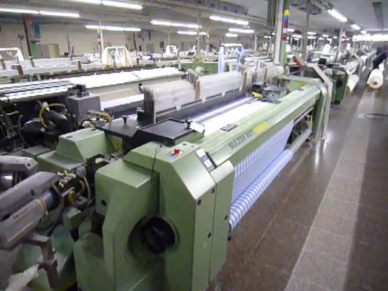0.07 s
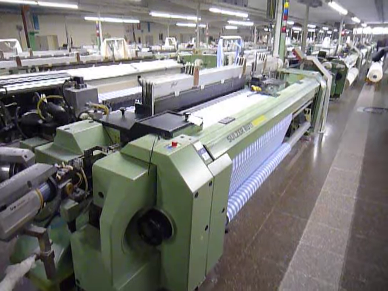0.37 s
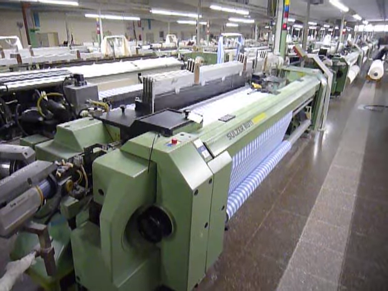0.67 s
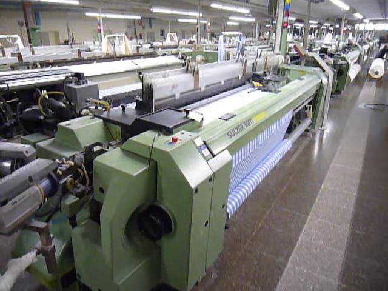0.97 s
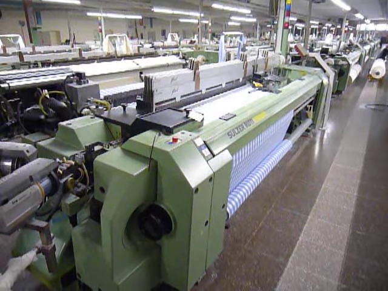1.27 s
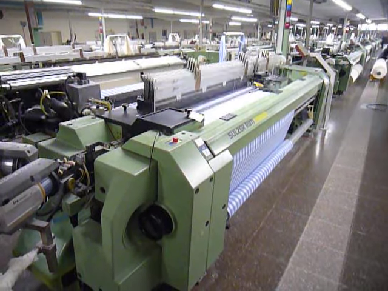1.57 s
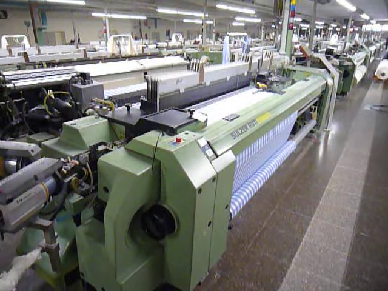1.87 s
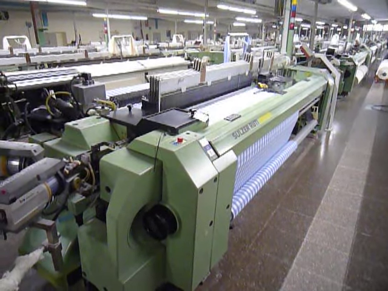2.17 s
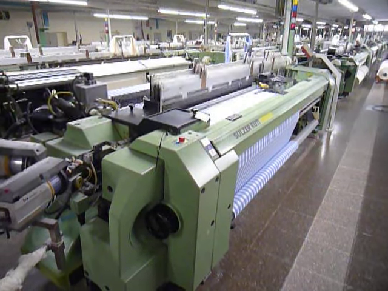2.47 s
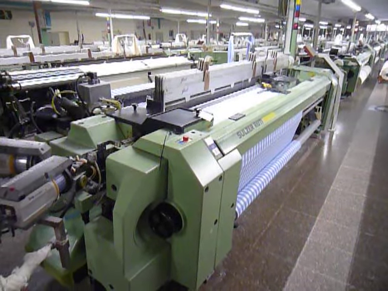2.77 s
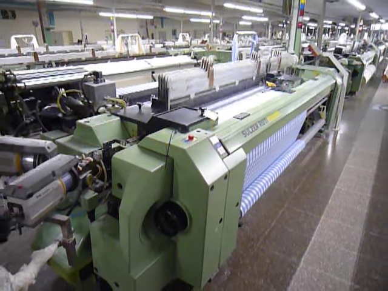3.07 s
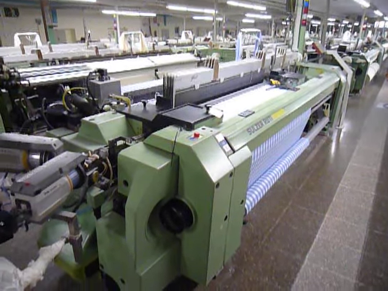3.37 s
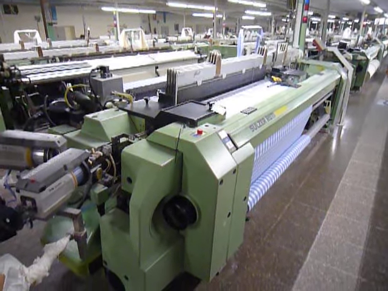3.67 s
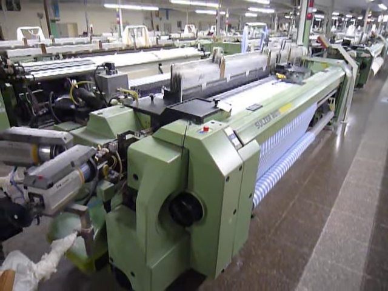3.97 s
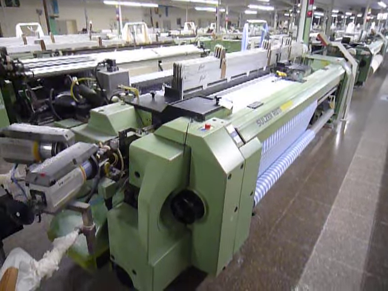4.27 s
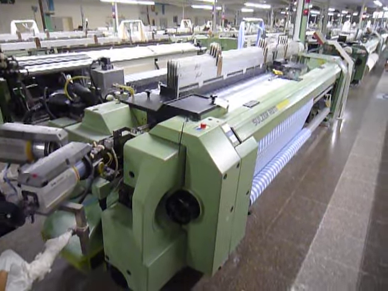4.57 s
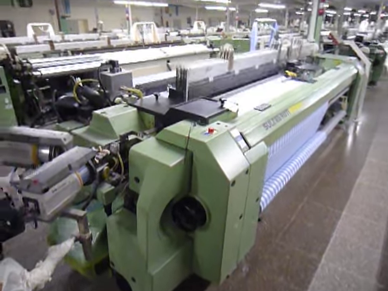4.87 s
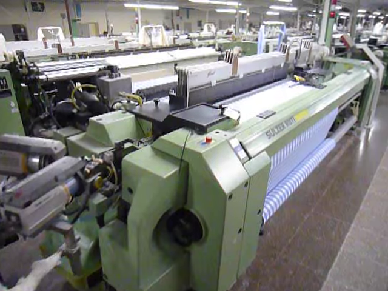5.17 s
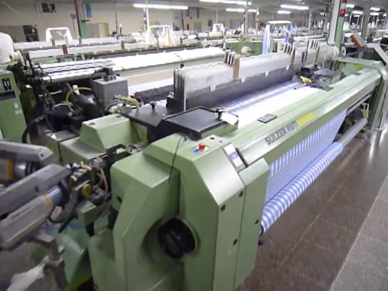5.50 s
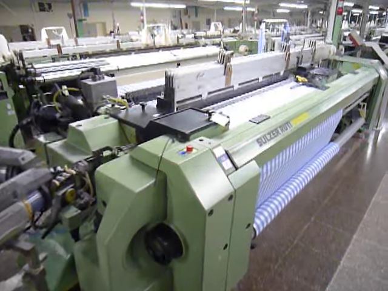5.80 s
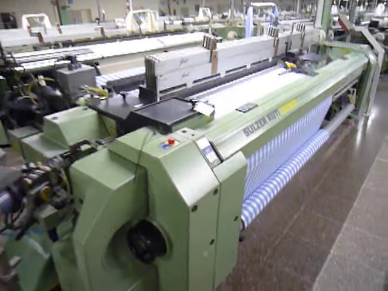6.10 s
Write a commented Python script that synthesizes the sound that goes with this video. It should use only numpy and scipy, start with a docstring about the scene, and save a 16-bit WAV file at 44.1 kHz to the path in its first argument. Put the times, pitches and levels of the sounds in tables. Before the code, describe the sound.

After a split second of silence, a sharp click starts the sound abruptly. A weaving loom close by clatters in a fast, even cycle of steel strikes, about five cycles a second. Neighbouring looms thud and rattle at their own speeds, sliding in and out of step, while hundreds more blend into a dense reverberant roar over a motor hum in a large mill hall. From 1 second on, single steel parts clank harder at irregular moments, some high and ringing, others low and blunt. Two short dull pops sound at about 1.2 and 1.8 seconds, the first louder. After 2.2 seconds the looms, roar and hum slowly ease a little as the microphone drifts along the aisle. Low knocks gather between 4 and 5 seconds, and the strongest lands near 5.8 seconds. The machines keep running to the end at about 6 seconds. The small microphone gives a narrow sound without high treble.

```python
"""After a brief silence, the sound starts abruptly with a sharp click. In a mill hall, a weaving loom
close by strikes the same steel parts at every pick; neighbouring looms beat at their own speeds, and
hundreds more merge into a reverberant roar over a motor hum. From 1 s on, single parts clank
harder; two dull pops sound at 1.2 and 1.8 s. After 2.2 s the looms, roar and hum slowly fade
as a small narrow-band microphone drifts along the aisle."""
import sys
import numpy as np
from scipy import signal
from scipy.fft import rfft, irfft, next_fast_len
from scipy.io import wavfile

SR = 44100
rng = np.random.default_rng(int(sys.argv[2]) if len(sys.argv) > 2 else 0)


def file_out(sig):
    """Save sig as 16-bit WAV at sys.argv[1]."""
    # one column per channel
    cols = np.atleast_2d(sig).T
    # limit, then scale
    lim = np.clip(cols, -1, 1)
    pcm = np.round(lim * 32767).astype(np.int16)
    wavfile.write(sys.argv[1], SR, pcm)


N = 275184


def amp(db):
    """Decibels to gain."""
    return 10 ** (np.asarray(db) / 20)


def unit(x):
    """x at rms 1."""
    return x / np.sqrt(np.mean(x ** 2) + 1e-20)


def along(points, hz):
    """(Hz, value) points interpolated on a log frequency axis."""
    point_hz, values = np.transpose(points)
    return np.interp(np.log(hz + 1), np.log(point_hz + 1), values)


def filtered(x, response):
    """x through a zero-phase filter of gain response(hz)."""
    size = next_fast_len(len(x) + 8192)
    hz = np.fft.rfftfreq(size, 1 / SR)
    return irfft(rfft(x, size) * response(hz), size)[:len(x)]


def noise(response):
    """Coloured noise of rms 1."""
    return unit(filtered(rng.standard_normal(N), response))


def blow(age_s, rise_s, t60_s):
    """Envelope of a struck part: quick rise, exponential decay."""
    age_s = np.maximum(age_s, 0)
    return (1 - np.exp(-age_s / rise_s)) * amp(-60 * age_s / t60_s)


def strokes(pick_hz, offset_s, rise_s, t60_s, scatter_db, jitter_s=0.002):
    """Envelope of one stroke repeated every pick, never quite equally hard or on time."""
    t = np.arange(N) / SR
    turns = (t - offset_s) * pick_hz + 1
    pick = np.maximum(turns, 0).astype(int)
    force, lateness = rng.standard_normal((128, 2)).T
    age_s = turns % 1 / pick_hz - jitter_s * lateness[pick]
    return amp(scatter_db * force)[pick] * blow(age_s, rise_s, t60_s)


def struck(envelope, ring_hz, width_oct):
    """Steel part with modes crowded around ring_hz, rattled by a force following the envelope."""
    def modes(hz):
        return np.exp(-0.5 * (np.log2((hz + 1) / ring_hz) / width_oct) ** 2)
    power_share = np.mean(modes(np.fft.rfftfreq(8192, 1 / SR)) ** 2)
    return filtered(envelope * rng.standard_normal(N), modes) / np.sqrt(power_share)


def near_loom(pick_hz=5.338):
    """Picking, projectile brake, beat-up and heald frames each ring their own part once a pick."""
    # Strokes of one pick. Each row: offset in seconds, level in dB, ring in Hz, width in octaves,
    # rise in seconds, t60 in seconds.
    pick_cycle = [(.006, -26, 1120, 0.37, .003, 0.018), (0.022, -25.5, 260, 0.41, .003, 0.046),
                  (0.027, -33.5, 2240, 0.88, 0.0039, 0.22), (0.069, -27.5, 3410, 0.33, 0.014, .2),
                  (0.091, -28.5, 3340, 0.27, 0.0025, 0.049), (.095, -28.5, 1346, 0.65, 0.0048, .14),
                  (.149, -33, 300, 0.68, 0.0076, .16), (0.156, -44, 2320, 0.26, 0.0036, .05)]
    out = np.zeros(N)
    for offset_s, db, ring_hz, width_oct, rise_s, t60_s in pick_cycle:
        envelope = strokes(pick_hz, offset_s, rise_s, t60_s, scatter_db=1.2)
        out += amp(db) * struck(envelope, ring_hz, width_oct)
    return out


def neighbours(pick_range_hz, ring_range_hz, width_oct, t60_s, count=11):
    """Looms at different speeds, each heard by one ringing part, slide in and out of step."""
    rings_hz = rng.permutation(np.geomspace(*ring_range_hz, count))
    out = np.zeros(N)
    for pick_hz, ring_hz in zip(np.linspace(*pick_range_hz, count), rings_hz):
        offset_s = rng.random() / pick_hz
        envelope = strokes(pick_hz, offset_s, rise_s=0.0018, t60_s=t60_s, scatter_db=0.75)
        out += struck(envelope, ring_hz, width_oct)
    return unit(out)


def far_roar():
    """Hundreds of far looms overlap into noise, coloured by the parts they all share."""
    # Roar spectrum. Each row: frequency in Hz, relative density in dB.
    spectrum = [(25, -30.5), (45, -25), (75, -17), (112, -10), (150, -3), (185, -2.5), (250, 1), (440, 0.5),
                (600, -3.5), (880, -2), (1400, -9.5), (2100, -10.5), (3000, -13), (4500, -14.5)]
    # Resonances of steel frames and covers. Each row: centre in Hz, half-width in Hz, lift in dB.
    covers = [(148, 28, 2.5), (476, 28, 2.5), (815, 37, 1), (1340, 60, 1), (2250, 30, 2), (3180, 130, 2.5)]

    def lift_db(hz):
        return sum(db / (1 + ((hz - centre_hz) / width_hz) ** 2) for centre_hz, width_hz, db in covers)
    return noise(lambda hz: amp(along(spectrum, hz) + lift_db(hz)))


def motors():
    """Many drive motors at nearly the same speed blur into narrow, beating lines."""
    # Hum lines. Each row: centre in Hz, half-width in Hz, level in dB.
    hum_lines = [(102.6, 4.6, -45.5), (255, 18, -43.5), (315, 5.1, -45.5), (390.8, 3.1, -42)]
    return sum(amp(db) * noise(lambda hz: 1 / (1 + ((hz - line_hz) / width_hz) ** 4))
               for line_hz, width_hz, db in hum_lines)


def hall(x):
    """Diffuse reverberation of the hall; treble dies first."""
    # Hall decay. Each row: frequency in Hz, t60 in seconds.
    decay_times = [(150, 1.1), (1000, 2.6), (4000, 0.51)]
    hz, t, spectra = signal.stft(rng.standard_normal(SR), SR, nperseg=256)
    decay = amp(-60 * t / along(decay_times, hz)[:, None])
    tail = signal.istft(spectra * decay, SR, nperseg=256)[1]
    return irfft(rfft(x) * rfft(tail / np.linalg.norm(tail), N), N)


def clanks():
    """Single steel parts hit harder; small high ones ring longer and purer than big low ones."""
    # Loudest knocks around the aisle. Each row: start in seconds, level in dB, ring in Hz.
    knocks = [(1.01, -29, 3070), (1.25, -19, 380), (1.345, -22, 1430), (1.905, -27, 950),
              (2.345, -25.5, 2940), (2.736, -22.5, 1750), (3.02, -22.5, 2340), (3.378, -23.5, 1760),
              (3.645, -27, 3200), (4.085, -20.5, 328), (4.372, -20, 452), (4.582, -22.5, 1610),
              (4.694, -19.5, 420), (5.029, -26, 380), (5.785, -14, 400), (5.97, -28, 360)]
    t = np.arange(N) / SR
    out = np.zeros(N)
    for start_s, db, ring_hz in knocks:
        height_oct = np.log2(ring_hz / 1000)
        envelope = blow(t - start_s, rise_s=0.0042, t60_s=0.069 * 1.4 ** height_oct)
        out += amp(db) * struck(envelope, ring_hz, width_oct=0.32 * 0.66 ** height_oct)
    return out


def pops(width_s=0.00011, low_cut_hz=250):
    """Dull pops: short pushes of pressure with no weight in the bass."""
    # Pressure pulses. Each row: time in seconds, level in dB.
    pulses = [(1.2278, -9), (1.7757, -17)]
    t = np.arange(N) / SR
    pressure = sum(amp(db) * np.exp(-0.5 * ((t - at_s) / width_s) ** 2) for at_s, db in pulses)
    return filtered(pressure, lambda hz: hz ** 2 / (hz ** 2 + low_cut_hz ** 2))


def drift(start_db, fade_db_per_s, hold_s=2.2):
    """Gain of a source that holds, then fades as the microphone leaves it behind."""
    fading_s = np.maximum(np.arange(N) / SR - hold_s, 0)
    return amp(start_db - fade_db_per_s * fading_s)


def scene():
    """Looms and clanks with their reverberation, plus roar, hum and pops, at one microphone."""
    roar_gain = drift(start_db=-1, fade_db_per_s=0.46)
    clatter_gain = drift(start_db=-1.4, fade_db_per_s=0.2)
    thuds = amp(-38) * neighbours(pick_range_hz=(3.4, 5.75), ring_range_hz=(293, 497),
                                  width_oct=0.45, t60_s=0.052)
    clatter = amp(-34) * neighbours(pick_range_hz=(3.1, 5.4), ring_range_hz=(574, 2330),
                                    width_oct=0.87, t60_s=0.077)
    machines = roar_gain * thuds + clatter_gain * (near_loom() + clatter) + clanks()
    far = roar_gain * (amp(-22.5) * far_roar() + motors())
    return (machines + amp(-7) * hall(machines) + far + pops())[None]


def record(dry, start_s=0.036, click_hz=1150, click_t60_s=0.008, dc_offset=-0.024, top_hz=4680):
    """Brief silence, then a sharp click. The microphone adds an offset, rounds peaks and cuts treble."""
    # Microphone treble roll-off. Each row: frequency in Hz, gain in dB.
    roll_off = [(3150, 5), (3500, 2), (3800, -3.5), (4150, -13), (4500, -29.5), (4700, -64)]
    age_s = np.maximum(np.arange(N) / SR - start_s, 0)
    settling = amp(-60 * age_s / click_t60_s)
    ping = amp(-1) * np.sin(2 * np.pi * click_hz * age_s)
    surge = 3.2 * dry[0]
    click = settling * (ping + surge)
    live = (dry[0] + dc_offset + click) * (age_s > 0)
    rounded = live / (1 + (live / 0.8) ** 8) ** (1 / 8)  # soft limit at 0.8
    return filtered(rounded, lambda hz: amp(along(roll_off, hz)) * (hz < top_hz))[None]


dry = scene()
out = record(dry)
file_out(out)
```